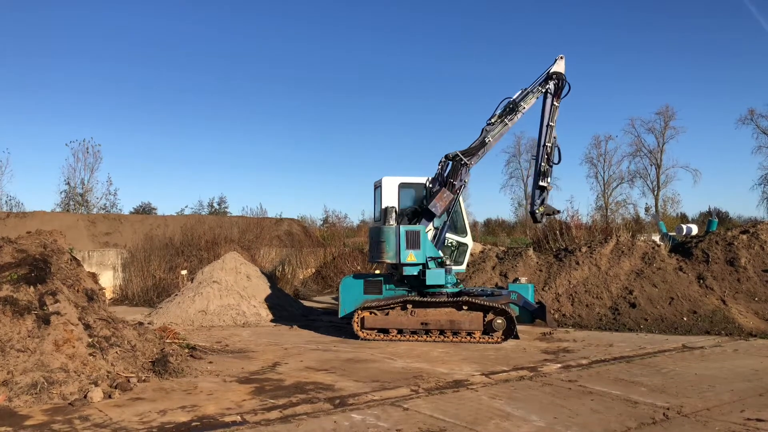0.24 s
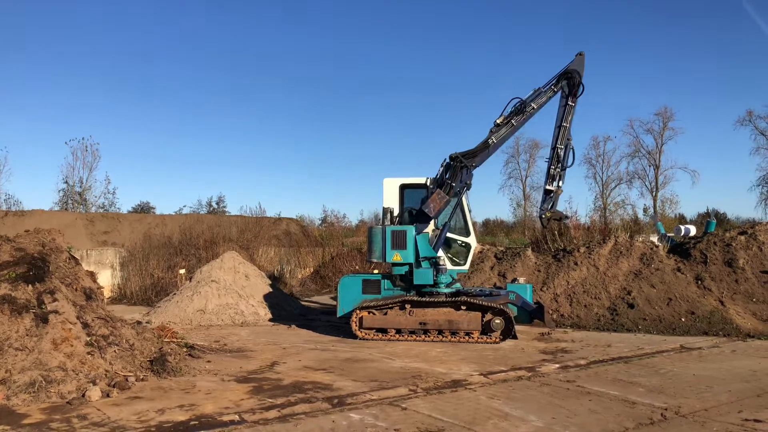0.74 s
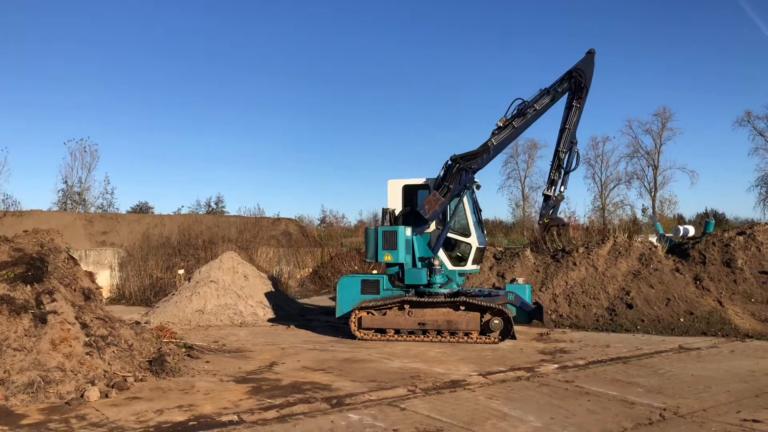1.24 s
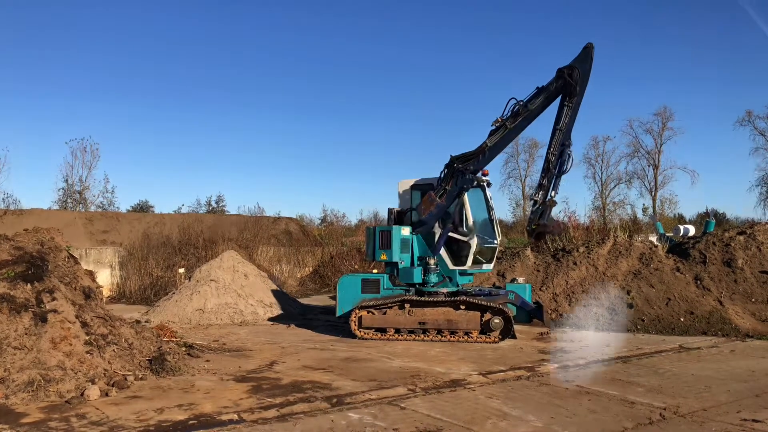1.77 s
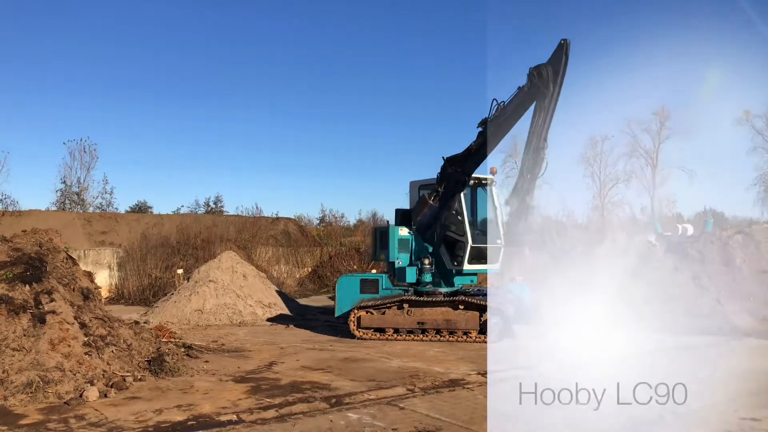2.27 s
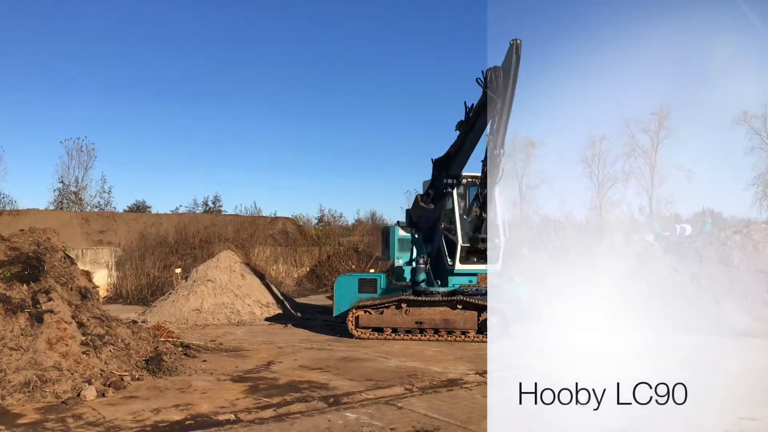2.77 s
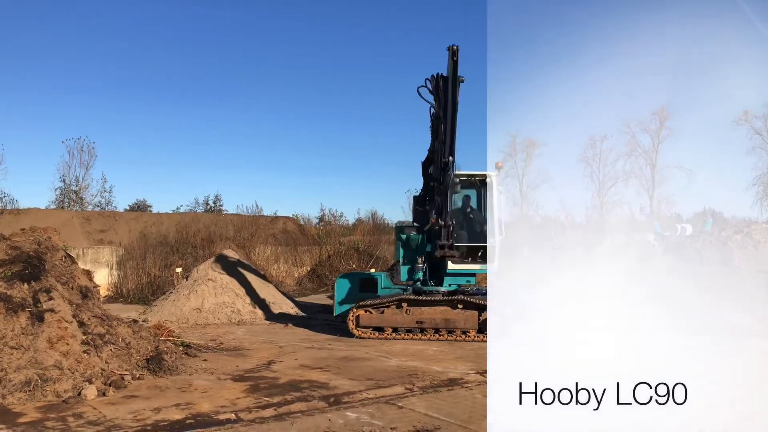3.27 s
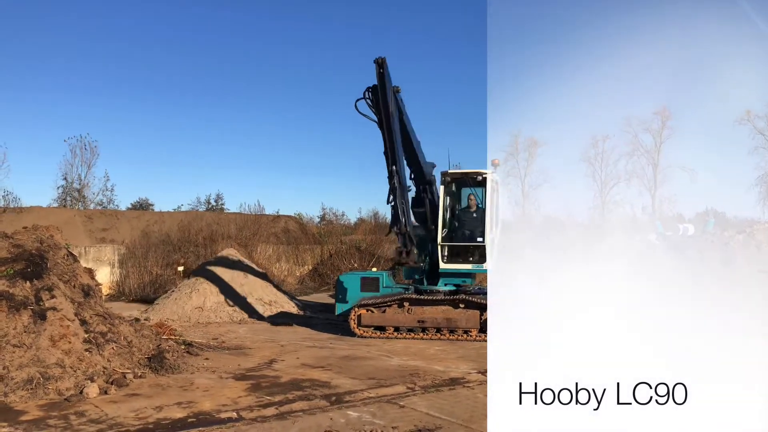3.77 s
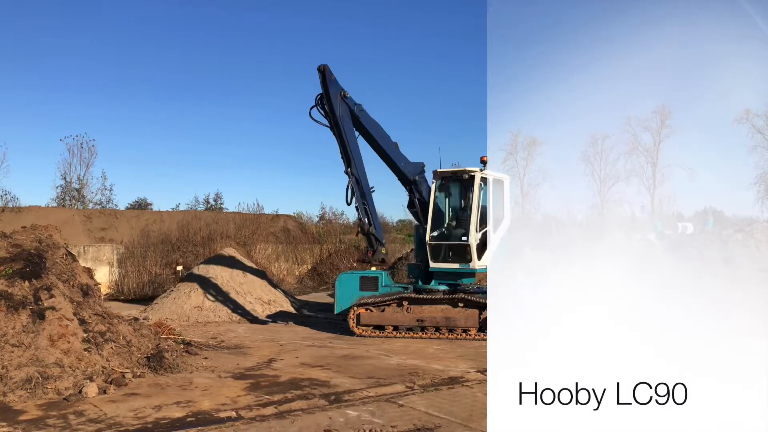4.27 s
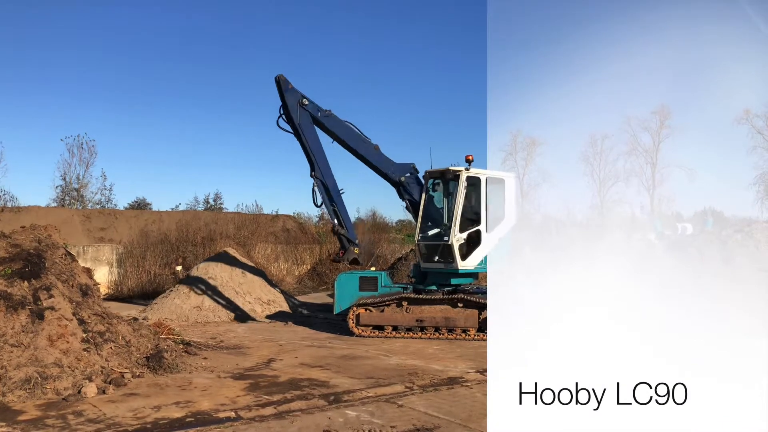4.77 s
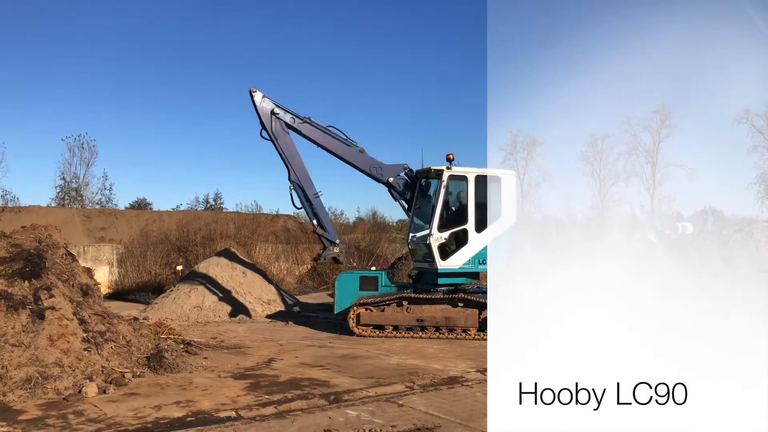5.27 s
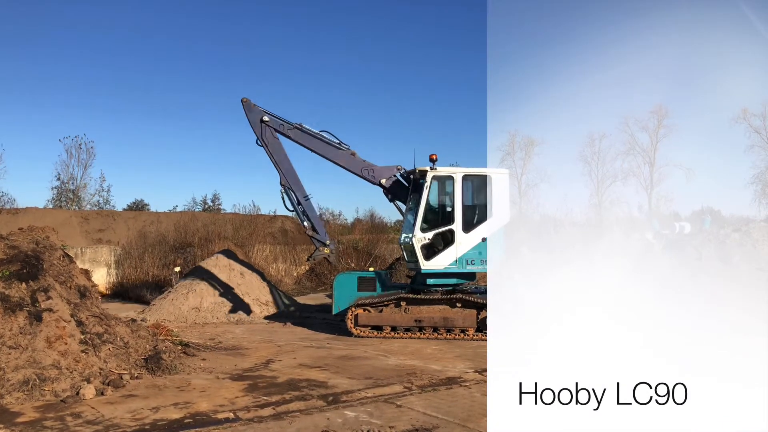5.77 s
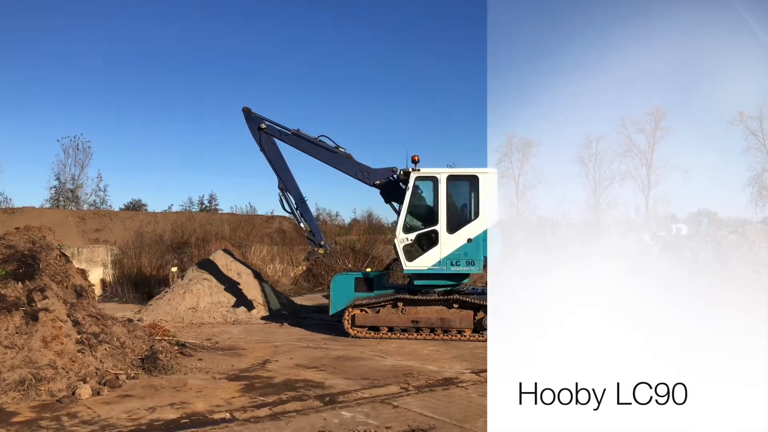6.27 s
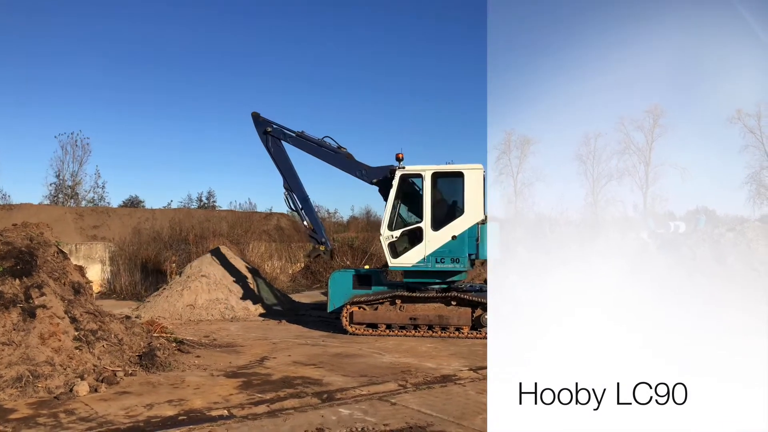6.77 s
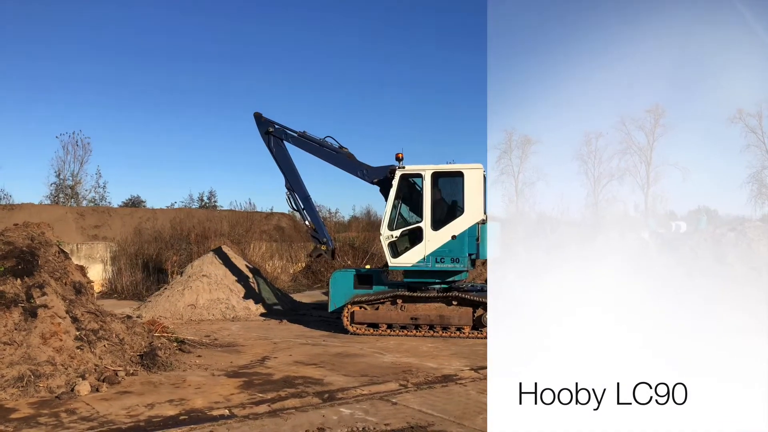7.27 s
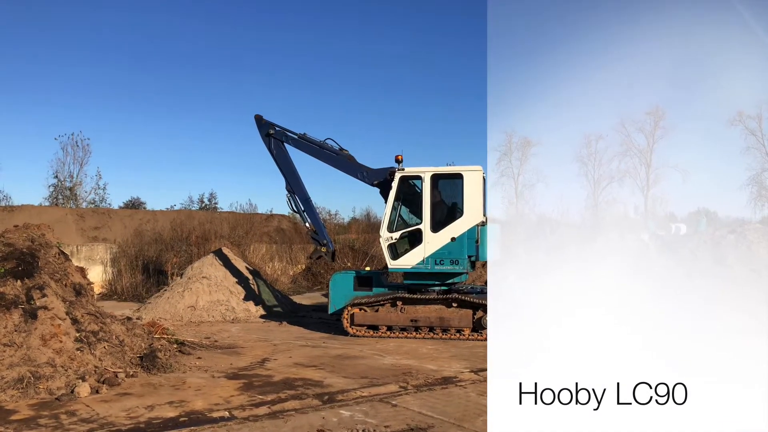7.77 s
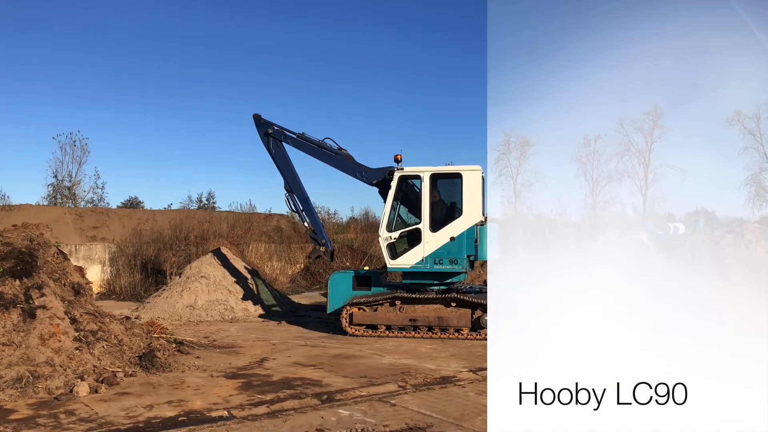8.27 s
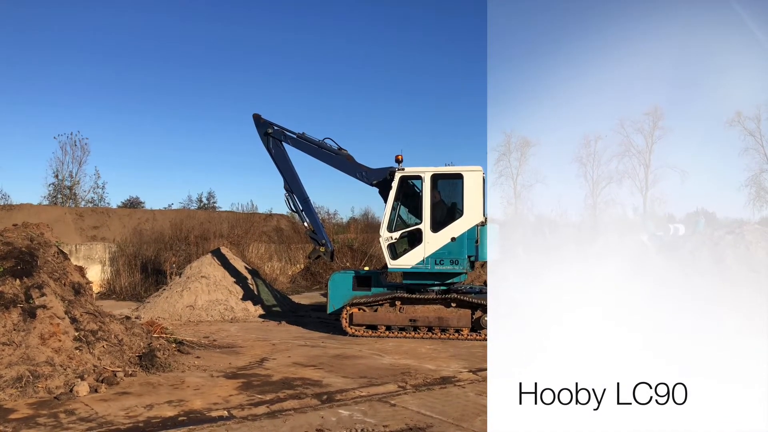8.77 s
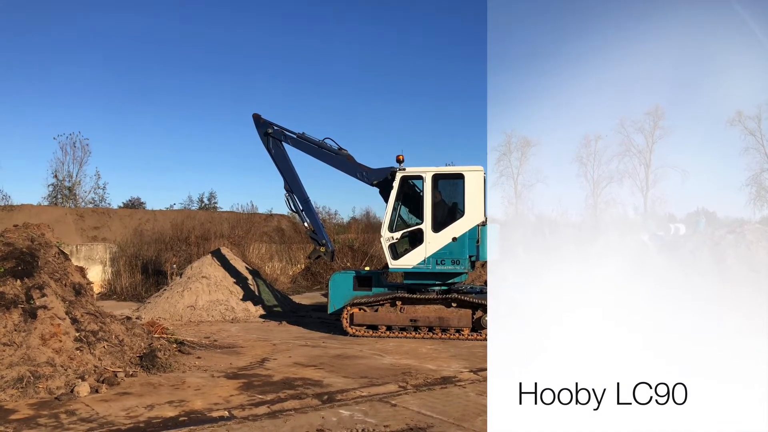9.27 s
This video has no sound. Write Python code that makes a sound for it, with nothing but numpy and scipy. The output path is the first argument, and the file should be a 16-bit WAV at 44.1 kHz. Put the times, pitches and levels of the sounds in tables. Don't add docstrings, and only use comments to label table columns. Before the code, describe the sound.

Mono phone sound in an open yard, no room echo. A four-cylinder diesel crane engine drones throughout some way off, a low firing hum near 65 Hz with buzzing harmonics, a resonant silencer and mid-range panel roar. From 0.5 to 1.7 s it surges, dips and surges again, then holds fairly steady to 3.9 s as the body slews, with fine hydraulic hiss, fluttering fan air and a barely audible thin gear whine. Faint pump ticks run about ten a second. Around 4.1 s the revs jump, sag at 4.6 and jump again at 4.9; a relief valve spits a rough jet from 4.55 to 4.85 s. Small wavers follow until 7.2 s, then an even drone, the high hiss duller. Soft wind thumps come near 2.0, 2.5, 5.4 and 6.0 s, strongest around 7.9, again at 8.5. It ends still running.

```python
import sys
import numpy as np
from scipy import signal
from scipy.fft import rfft, irfft, next_fast_len
from scipy.io import wavfile
from scipy.ndimage import uniform_filter1d, map_coordinates

SR = 44100
rng = np.random.default_rng(int(sys.argv[2]) if len(sys.argv) > 2 else 0)


def volts(x):
    e = np.asarray(x, float) / 20
    return 10 ** e


def inscribe(sig):
    pcm = np.round(np.clip(np.atleast_2d(sig).T, -1, 1) * 32767)
    wavfile.write(sys.argv[1], SR, pcm.astype(np.int16))


N = 419830


def unit(x):
    return x / np.sqrt(np.mean(x ** 2) + 1e-20)


def along(points, hz):
    f, v = np.transpose(points)
    return np.interp(np.log(hz + 1), np.log(f + 1), v)


def curves(rows):
    s, *cols = np.transpose(rows)
    return [np.interp(np.arange(N) / SR, s, c) for c in cols]


def bump(s, db, half_s):
    return db * np.exp(-((np.arange(N) / SR - s) / half_s) ** 2)


def wobble(rate):
    steps = np.arange(0, N + 64, 64)
    knots = rng.standard_normal(int(N * 40 / SR) + 4)
    smooth = map_coordinates(knots, [steps * min(rate, 40) / SR])
    return np.interp(np.arange(N), steps, smooth)


def coloured(x, gain):
    m = next_fast_len(len(x) + 8192)
    spectrum = rfft(x, m) * gain(np.fft.rfftfreq(m, 1 / SR))
    return unit(irfft(spectrum, m)[:len(x)])


def rush(spectrum, patchy_db, peaks=(), ripple_db=.9):
    z = signal.stft(rng.standard_normal(N), nperseg=512)[2]
    field = uniform_filter1d(rng.standard_normal(z.shape), size=6, axis=0)
    field = uniform_filter1d(field, size=14, axis=1)
    noise = signal.istft(z * volts(patchy_db * unit(field)), nperseg=512)[1][:N]
    ripple = rng.standard_normal(400)

    def gain(hz):
        humps = sum(db / (1 + (2 * (hz - c) / w) ** 2) for c, w, db in peaks)
        fine = ripple_db * np.interp(hz, np.linspace(0, SR / 2, len(ripple)), ripple)
        return volts(along(spectrum, hz) + humps + fine)

    return coloured(noise, gain)


def orders(table, angle, unsteady_db, drift):
    total = 0
    for k, db in table:
        level = volts(db + unsteady_db * wobble(7)) * np.sqrt(2)
        phase = k * angle + drift * np.sqrt(k) * wobble(9) + rng.uniform(0, 2 * np.pi)
        total = total + level * np.sin(phase)
    return total


def firing_rate():
    # (time [s], firing rate [Hz])
    speed = [(0, 62.8), (.3, 62.5), (.78, 69.2), (1.32, 63), (1.65, 67.6), (2.25, 65.9), (3.86, 66.4),
             (4.08, 72), (4.6, 58), (4.9, 73), (5.05, 67.2), (5.4, 67.2), (5.75, 64.6), (6.12, 67.8),
             (6.65, 66.9), (6.96, 69.7), (7.25, 66.8), (9.52, 66.7)]
    return uniform_filter1d(curves(speed)[0], size=4000)


def exhaust():
    # times [s], and the view heard then [0 behind, 1 exhaust side, 2 side on, 3 cab side]
    turn_s = [.45, .8, 3.9, 4.6, 6, 6.9]
    turn_view = [0, 1, 1, 2, 2, 3]
    # (time [s], firing tone level [dB])
    mouth = [(0, -27), (.37, -24.5), (.53, -20.5), (1.0, -25), (1.53, -20.5), (1.8, -23), (2.5, -21.5),
             (3.94, -21), (4.3, -29), (4.47, -25), (4.83, -20), (5.1, -28.5), (5.27, -26), (6.0, -29),
             (6.15, -23), (6.7, -24.5), (7.08, -30.5), (7.5, -28.5)]
    # (time [s], loss [dB], half length [s])
    fuel_cuts = [
        (4.162, 7, 0.11),
        (4.62, 10, 0.11),
        (4.986, 10, 0.081),
        (6.057, 10, 0.029),
    ]
    # (time [s], third order level [dB])
    uneven = [(0, -40), (.6, -33.5), (.75, -33.5), (1.6, -32), (1.8, -36.5), (3.2, -35.5), (3.5, -52),
              (3.75, -35.5), (6.9, -37.5), (7.1, -41)]
    fourth = [-46.5, -45, -48.5, -39.5]
    # (multiple of shaft speed [1], level in each of the four views [dB])
    orders_seen = [(1, -65, -95, -60, -78), (5, -45, -41, -42, -40), (6, -47, -44.5, -44.5, -40.5),
                   (7, -44, -43.5, -46.5, -40.5), (8, -45, -44.5, -46, -43), (9, -55, -48, -53.5, -57.5),
                   (10, -74, -64.5, -51, -59), (11, -56, -51.5, -53, -56), (12, -49, -66, -57.5, -58.5),
                   (13, -70, -61, -58.5, -54), (14, -49.5, -56, -53.5, -62), (16, -54, -63, -49.5, -52.5),
                   (18, -60, -75, -52, -57), (20, -47, -52.5, -54.5, -57), (21, -52, -51, -51, -57)]
    blade = [-58, -51, -52, -52.5]
    drone_seen = [-35.5, -37, -34.5, -37.5]
    # (time [s], gain [dB], half length [s])
    booms = [
        (1.05, 2.5, .25),
        (4.68, 5.5, .15),
        (5.25, 2.5, .1),
        (5.8, -3, .25),
        (6.9, -2, .2),
    ]
    # (frequency [Hz], density [dB per Hz])
    silencer = [(50, -37), (80, 5), (130, 7), (200, 2), (228, 12.5), (250, 2), (276, 10.5), (305, -6),
                (340, -17), (450, -44)]

    rate = firing_rate()
    angle = np.cumsum(rate) * np.pi / SR
    droop = np.clip(66.5 - rate, 0, None)
    view = np.interp(np.arange(N) / SR, turn_s, turn_view)
    seen = lambda db: np.interp(view, range(len(db)), db)
    cut_db = sum(bump(*cut) for cut in fuel_cuts)

    firing = orders([(1.999, curves(mouth)[0] - cut_db)], angle, unsteady_db=1.0, drift=0.046)
    third_db = curves(uneven)[0] - .5 * cut_db + 0.52 * wobble(2.73)
    lug_db_per_hz, lug_top_db = 4, 15.5
    lug_db = np.minimum(lug_db_per_hz * droop, lug_top_db)
    fourth_db = seen(fourth) + lug_db - 0.47 * cut_db + 3 * wobble(3.6)
    low = firing + orders([(3, third_db), (4, fourth_db)], angle, unsteady_db=1.3, drift=.08)

    smear_half_db, smear_hz_per_s = 5, 36
    racing = uniform_filter1d(np.abs(np.gradient(rate)) * SR, size=4000)
    smear_db = 2 * smear_half_db * racing / (racing + smear_hz_per_s)
    upper = [(round(k), seen(db) - smear_db * (k > 8)) for k, *db in orders_seen]
    high = orders(upper, angle, unsteady_db=1.8, drift=.09)

    blade_phase = 2 * np.pi * np.cumsum(566 + 4 * wobble(5)) / SR
    blades = volts(seen(blade) + 1.6 * wobble(6)) * np.sqrt(2) * np.sin(blade_phase)
    drone_db = seen(drone_seen) + sum(bump(*boom) for boom in booms) + 0.17 * wobble(2.2)
    drone = volts(drone_db) * rush(silencer, patchy_db=-0.5)
    return low + high + drone + blades


def engine_bay():
    # (time [s], roar level [dB])
    effort = [(.1, -34.5), (.48, -34.5), (.58, -36), (.9, -38.5), (1.36, -33.5), (1.55, -36), (3.95, -37),
              (4.1, -40.5), (4.63, -34.5), (4.83, -33.5), (4.95, -40), (5.83, -35.5), (6.0, -38.5),
              (6.5, -39), (6.76, -36.5), (6.95, -39), (8.2, -38), (9.52, -40.5)]
    # (frequency [Hz], density [dB per Hz])
    roar_spectrum = [(180, -11), (300, -5), (500, -6), (610, -6), (1090, -6.5), (1400, -6.5), (2000, -10),
                     (2300, -12), (2600, -14.5), (3300, -20.5), (3900, -29.5), (5400, -34), (9200, -120)]
    # (frequency [Hz], width [Hz], gain [dB])
    panels = [(540, 72, 4.5), (760, 36, 3), (854, 39, 4.5), (945, 14, 7.5), (1610, 40, 7.5), (1755, 54, 5),
              (1935, 110, 2.5), (2065, 27, 6), (2197, 49, 4), (2906, 93, 7), (3210, 53, 0.5)]
    # (frequency [Hz], density [dB per Hz])
    hiss_spectrum = [(2100, -42), (3600, -12), (4050, -8), (4500, -2.5), (5200, 2), (6300, -2), (7000, -3),
                     (8000, -1), (9300, -3.5), (10100, -9), (11100, -17.5), (12500, -32), (20000, -120)]
    # (frequency [Hz], width [Hz], gain [dB])
    hose_rings = [(6970, 450, 3), (8500, 400, -1), (9350, 400, 2)]
    # (frequency [Hz], density [dB per Hz])
    air_spectrum = [(10500, -44), (11700, -20), (12800, 1), (14500, -1), (16000, 1)]
    # (time [s], depth [0-1])
    flutter = [(0, .12), (.9, .22), (1.5, .33), (2.4, .42), (3.7, .28), (4.1, .05), (9.52, .05)]

    t = np.arange(N) / SR
    roar_db = curves(effort)[0] + 0.2 * wobble(9)
    strain_db = roar_db + 37
    hiss_db = -54 + 1.23 * strain_db - 0.18 * t + .4 * wobble(6)
    belt_slip_db = bump(.63, 7, .03)
    air_db = -62 + 1.2 * strain_db - 0.66 * t + belt_slip_db

    roar = rush(roar_spectrum, patchy_db=-0.76, peaks=panels)
    hiss = rush(hiss_spectrum, patchy_db=1.4, peaks=hose_rings) * volts(.7 * wobble(24))
    beat_s, beat_period_s = 2.491, .05455
    beat = 1 + curves(flutter)[0] * np.cos(2 * np.pi * (t - beat_s) / beat_period_s)
    air = rush(air_spectrum, patchy_db=1.5) * beat * volts(1.1 * wobble(8))
    return volts(roar_db - 1.05) * roar + volts(hiss_db) * hiss + volts(air_db) * air


def pump():
    # (time [s], housing knock level [dB], valve chirp level [dB])
    strokes = [(0, -68, -54), (.6, -37, -49), (1.2, -46, -64), (1.8, -42, -51.5), (3.1, -44, -51),
               (3.6, -39.5, -57), (4.2, -49, -64), (5.2, -41, -52), (5.6, -46, -52), (6.1, -39.5, -62),
               (6.7, -40, -62), (7.1, -61, -55), (8, -58, -66), (9.52, -64, -73)]
    # (frequency [Hz], density [dB per Hz])
    housing = [(900, -5), (1400, -6), (2000, -1), (2500, -7.5), (3200, -33), (5000, -31), (9000, -23),
               (11000, -60)]
    # (frequency [Hz], width [Hz], gain [dB])
    housing_rings = [(1610, 110, 13), (1910, 60, 11), (2215, 90, 11)]

    knock_db, chirp_db = curves(strokes)
    first_s, period_s = .017, .09642
    lap = (np.arange(N) / SR - first_s) / period_s + .25
    since = (lap % 1) * period_s
    luck = rng.standard_normal((int(lap[-1]) + 1, 3))[lap.astype(int)].T
    swell = lambda centre, width: np.exp(-((since - centre) / width) ** 2)
    rattle = rush(housing, patchy_db=.7, peaks=housing_rings)
    knock = volts(knock_db - .5 + 1.4 * luck[0]) * (.3 + .7 * swell(0.038, 0.023)) * rattle
    pitch = 7000 + 70 * luck[1] + 1400 * uniform_filter1d(rng.standard_normal(N), size=60)
    tone = np.sin(2 * np.pi * np.cumsum(pitch) / SR)
    chirp = volts(chirp_db - 1.5 + 2.4 * luck[2]) * swell(0.025, 0.011) * tone
    return knock + chirp


def relief_valve():
    # (time [s], level [dB])
    relief = [
        (4.2, -83),
        (4.4, -62),
        (4.58, -44),
        (4.64, -35.5),
        (4.74, -37),
        (4.84, -49),
        (4.92, -90),
    ]
    # (frequency [Hz], density [dB per Hz])
    jet = [(250, -42), (450, 4.5), (850, -9.5), (1200, -41), (3000, -21.5), (4500, -22.5), (9300, -17.5),
           (11000, -36), (16000, -44)]
    # (frequency [Hz], width [Hz], gain [dB])
    jet_rings = [(638, 47, 10), (830, 76, 12), (3260, 65, 14.5), (4220, 60, 8), (4590, 97, 10)]
    return volts(curves(relief)[0] + 2.6 * wobble(40)) * rush(jet, patchy_db=-4.0, peaks=jet_rings)


def slewing_motor():
    # (time [s], frequency [Hz], level [dB])
    whine = [
        (1.3, 4500, -92),
        (2.2, 4492, -75),
        (3.3, 4480, -71),
        (4.1, 4452, -77),
        (4.4, 4466, -95),
    ]
    hz, db = curves(whine)
    phase = 2 * np.pi * np.cumsum(hz + 12 * wobble(30)) / SR
    return volts(db + 3.0 * wobble(3.8)) * np.sin(phase)


def wind():
    # (start [s], length [s], level [dB], top frequency [Hz])
    puffs = [(1.68, 0.053, -38, 89.5), (2.006, 0.022, -22.5, 351.8), (2.519, 0.04, -24, 199.8),
             (2.551, 0.031, -23.5, 460), (2.698, 0.11, -34, 100), (3.86, 0.066, -33, 400),
             (4.498, 0.029, -35, 160), (5.358, 0.036, -27, 300), (5.396, 0.052, -23.5, 420),
             (5.443, 0.047, -21, 540), (6.016, 0.021, -19.5, 220), (6.349, 0.11, -32, 110.7),
             (6.799, 0.078, -29, 250), (7.47, 0.1, -35, 129.4), (7.851, 0.046, -19.5, 546),
             (7.872, 0.037, -13.5, 120), (7.94, 0.048, -24.5, 400), (7.982, 0.028, -21.5, 390),
             (8.006, 0.037, -20.5, 139), (8.393, 0.049, -27.5, 300), (8.485, 0.031, -26.5, 393),
             (8.519, 0.026, -20, 198.5), (9.47, 0.052, -44, 120)]
    # (frequency [Hz], density [dB per Hz])
    rumble_spectrum = [(15, -14), (30, 2), (45, 10), (80, 6), (160, 0), (300, -69)]

    out, t = np.zeros(N + SR), np.arange(6000) / SR
    all_eddies = rng.standard_normal((len(puffs), len(t)))
    for (s, length, db, top_hz), eddies in zip(puffs, all_eddies):
        gate = np.clip(np.minimum(t / 0.0055, (length - t) / 0.014 + .5), 0, 1)

        def gain(hz):
            high_pass = hz ** 3 / (hz ** 3 + 62 ** 3)
            return high_pass / (1 + hz / 140) / (1 + (hz / top_hz) ** 4)

        puff = coloured(eddies, gain)
        loudness = np.sqrt(np.mean(puff[gate > .5] ** 2))
        out[round(s * SR):][:len(t)] += volts(db) * gate * puff / loudness
    rumble_db = -47.5 + 1.5 * wobble(2) + 2.5 * wobble(14)
    rumble = volts(rumble_db) * rush(rumble_spectrum, patchy_db=1.5)
    port_top = .34
    return port_top * np.tanh(out[:N] / port_top) + rumble


def scene():
    mix = exhaust() + engine_bay() + pump() + relief_valve() + slewing_motor() + wind()
    return mix[None]


def band_limit(x):
    return signal.sosfilt(signal.butter(12, 16470, fs=SR, output="sos"), x)


def record(dry):
    top_hz = 15740
    m = next_fast_len(N + 8192)
    passed = np.fft.rfftfreq(m, 1 / SR) < top_hz
    kept = irfft(rfft(dry, m) * passed, m)[:, :N]
    return band_limit(kept)


dry = scene()
out = record(dry)
inscribe(out)
```